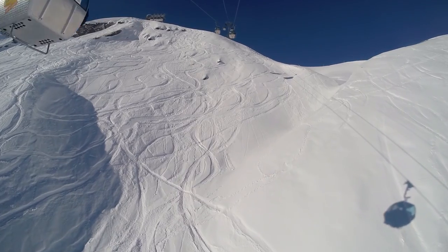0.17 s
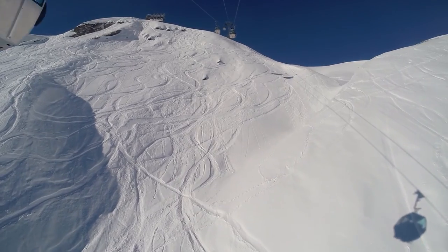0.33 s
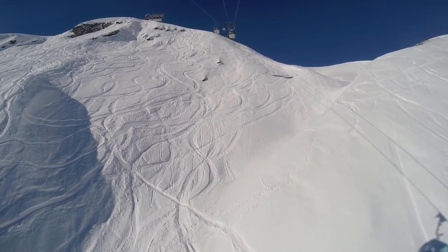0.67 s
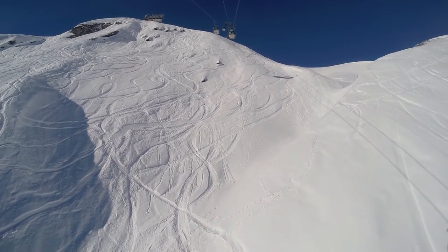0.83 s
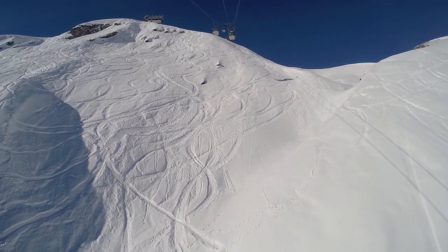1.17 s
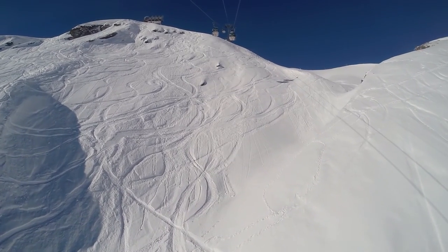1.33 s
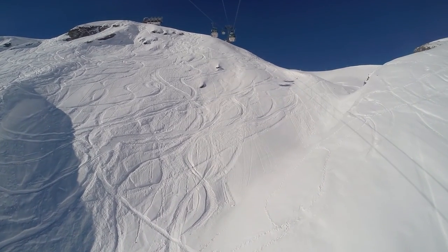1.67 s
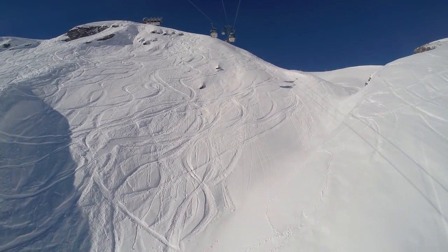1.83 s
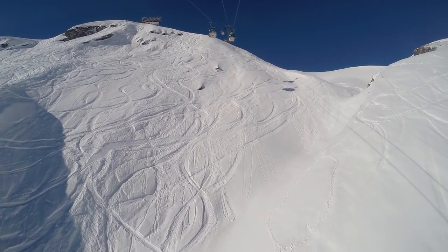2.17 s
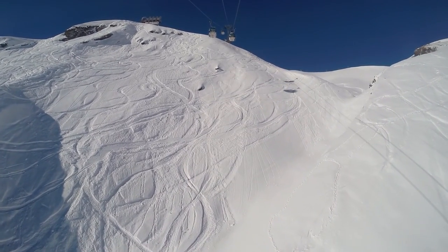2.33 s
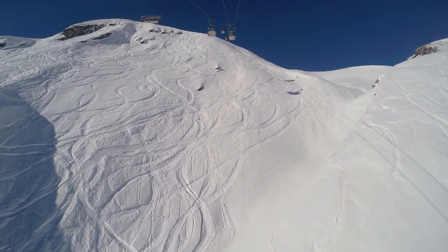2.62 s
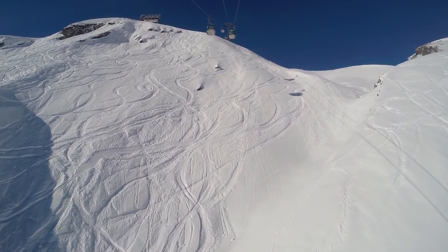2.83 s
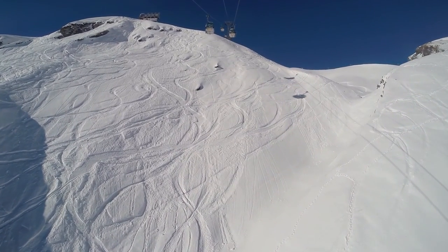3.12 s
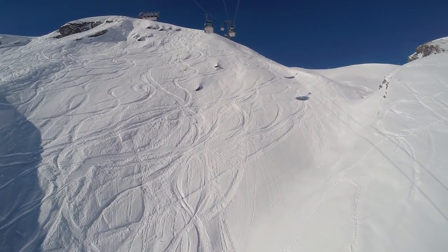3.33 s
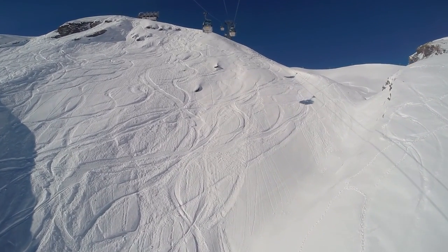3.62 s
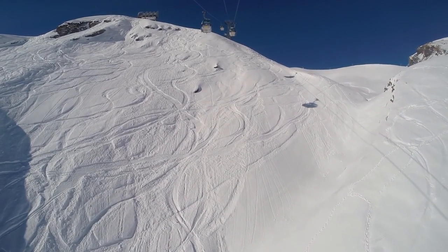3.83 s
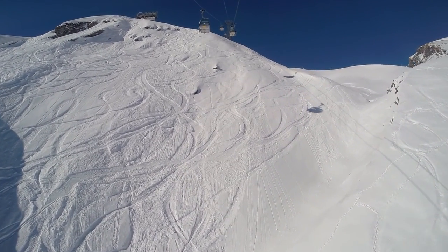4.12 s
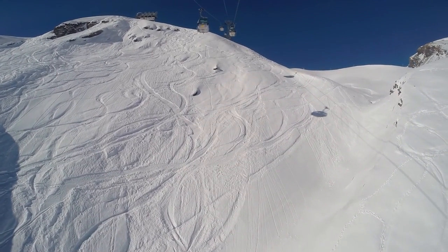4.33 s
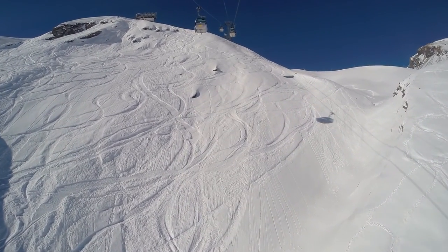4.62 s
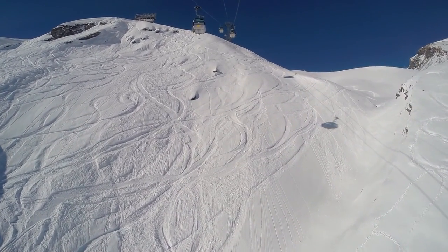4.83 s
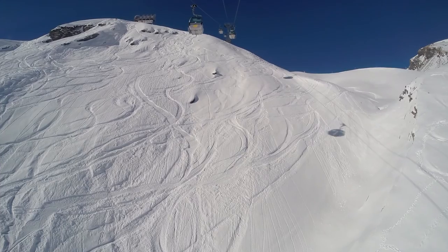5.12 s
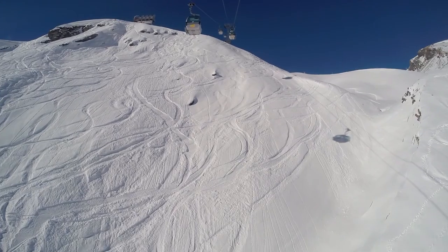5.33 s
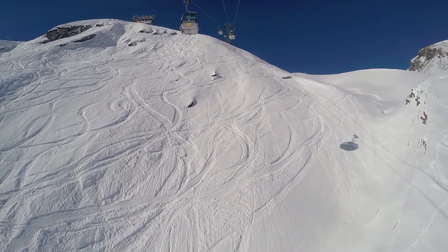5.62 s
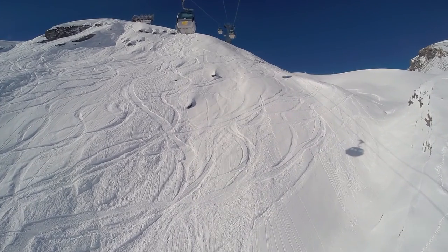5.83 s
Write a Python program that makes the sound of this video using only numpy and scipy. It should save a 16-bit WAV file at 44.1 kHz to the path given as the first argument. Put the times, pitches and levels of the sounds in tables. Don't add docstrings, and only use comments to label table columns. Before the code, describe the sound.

A cabin riding a haul rope hums unevenly around a low note, with irregular heaving rumble underneath. Early movement brings soft bumps, fabric rustles, strap snaps, plastic ticks and loud crisp clasp clicks, all close to the camera microphone in a small enclosed space. Activity thins after two seconds, with clicks near 2.6 and 3.3, and the rumble calms while the hum swells again at the end.

```python
import sys
import numpy as np
from scipy import signal
from scipy.fft import rfft, irfft, next_fast_len
from scipy.io import wavfile
from scipy.ndimage import map_coordinates

SR = 44100
rng = np.random.default_rng(int(sys.argv[2]) if len(sys.argv) > 2 else 0)


def bounce(signal):
    frames = np.transpose(np.atleast_2d(signal))
    limited = np.clip(frames, -1, 1)
    pcm = np.round(limited * 32767).astype(np.int16)
    wavfile.write(sys.argv[1], SR, pcm)


def amplitude_ratio(level_db):
    exponent = np.asarray(level_db, float) / 20
    return 10 ** exponent


N = 264159


def unit(x):
    return x / np.sqrt(np.mean(x ** 2) + 1e-20)


def curves(rows):
    s, *cols = np.transpose(rows)
    return [np.interp(np.arange(N) / SR, s, c) for c in cols]


def wobble(rate):
    knots = rng.standard_normal(int(N * rate / SR) + 4)
    return map_coordinates(knots, [np.arange(N) * rate / SR])


def filtered(x, response):
    m = next_fast_len(len(x) + 8192)
    return irfft(rfft(x, m) * response(np.fft.rfftfreq(m, 1 / SR)), m)[:len(x)]


def shape(points):
    f, db = np.transpose(points)
    return lambda hz: amplitude_ratio(np.interp(np.log(hz + 1), np.log(f + 1), db, -120, -120))


def modes(rows):
    def response(f):
        total = 0
        for k, (center, width, db) in enumerate(rows):
            damped = 1j * f * width
            total = total + (-1) ** k * amplitude_ratio(db) * damped / (center * center - f * f + damped)
        return total
    return response


def noise(response, steady=0.):
    z = signal.hilbert(filtered(rng.standard_normal(N + 1), response))[:N]
    size = np.abs(z) / np.abs(z).mean()
    return unit(z.real / (size + 0.077) ** np.clip(steady, 0, 1))


def swells(times, levels_db, widths, rest_db):
    t = np.arange(0, N + 64, 64) / SR
    bells = np.exp(-((t - np.reshape(times, (-1, 1))) / np.reshape(widths, (-1, 1))) ** 2)
    peaks = np.interp(np.arange(N) / SR, t, amplitude_ratio(levels_db) ** 2 @ bells)
    return np.sqrt(peaks + amplitude_ratio(rest_db) ** 2)


def knocks(rows, body, ring_share, snap, soft_hz, sag=0.32):
    out, t = np.zeros(N + SR), np.arange(SR // 8) / SR
    sag_s = 0.0018
    for s, db, hz, t60, ring_db in rows:
        burst = rng.standard_normal(len(t)) * amplitude_ratio(-60 * t / t60)
        burst[0] = snap
        hit = filtered(burst, lambda f: modes(body)(f) / (1 + 1j * f / soft_hz) ** 2)
        swing = np.sin(2 * np.pi * hz * (t - sag * sag_s * np.exp(-t / sag_s)))
        ring = amplitude_ratio(ring_db - 20.0 - 60 * t / (ring_share * t60)) * swing
        hit = hit / np.abs(hit).max() + ring
        out[round(s * SR):][:len(t)] += amplitude_ratio(db + 2.0) * hit / np.abs(hit).max()
    return out[:N]


def camera():
    # (frequency [Hz], level [dB per Hz])
    hiss_color = [(140, -10.5), (240, -5.5), (285, -12), (536, -19), (735, -21), (1300, -27), (2080, -30.5),
                  (5530, -38), (7500, -42), (9760, -49), (12600, -49), (14000, -69.5), (15700, -67)]
    # (frequency [Hz], level [dB rms])
    whine_lines = [(10597, -84.5), (10645, -77), (10788, -94.5), (10837, -93.5), (10933, -88.5)]
    t = np.arange(N) / SR
    whine = np.zeros(N)
    for hz, db in whine_lines:
        whine += amplitude_ratio(db + 0.7 * wobble(6)) * np.sin(2 * np.pi * hz * t + 1.1 * wobble(14))
    hiss = amplitude_ratio(-52 + 0.5 * wobble(3.61)) * noise(shape(hiss_color))
    return hiss + np.sqrt(2) * whine


def fabric():
    # (time [s], length [s], level [dB], crispness [dB])
    strokes = [(0.037, 0.058, -51, -11.5), (0.192, 0.061, -63, -13), (0.334, 0.035, -59, -15),
               (0.55, 0.12, -57.5, -16), (0.728, 0.046, -57.5, -14), (0.865, 0.11, -57.5, -16.5),
               (1.218, 0.06, -58.5, -15), (1.335, 0.026, -57, -13), (1.372, 0.01, -55.5, -25),
               (1.437, 0.04, -60.5, -14), (1.53, 0.05, -65, -19), (1.71, 0.015, -62, -22),
               (1.91, 0.047, -58, -13.5), (2.047, 0.032, -58.5, -11), (2.284, 0.32, -69.5, -11),
               (2.672, 0.026, -60.5, -14), (2.79, 0.058, -66.5, -12), (3.382, 0.057, -65, -11),
               (3.514, 0.025, -67, -15), (3.7, 0.063, -69.5, -16), (3.836, 0.054, -66, -13),
               (4.782, 0.046, -69, -12), (5.393, 0.034, -64, -15)]
    # (frequency [Hz], level [dB per Hz])
    cloth_color = [(900, -6), (1400, -4.5), (2000, -8.5), (3100, -6), (3430, -1.5), (3800, -6),
                   (4900, -7.5), (5450, -4), (6000, -9), (7000, -10.5), (9000, -26), (11000, -47)]
    # (frequency [Hz], level [dB per Hz])
    crisp_color = [(6000, -24), (8000, 4), (10000, 4.5), (12500, 3), (13800, -5), (15600, -13)]
    s, length, db, crisp_db = np.transpose(strokes)
    rest_db = -66.5 - 1.5 * np.arange(N) / SR
    clumps = amplitude_ratio(1.2 * wobble(60) + 0.71 * wobble(440))
    body = unit(clumps * noise(shape(cloth_color)))
    crisp = unit(clumps * amplitude_ratio(1.0 * wobble(25.15)) * noise(shape(crisp_color)))
    rustle = swells(s, db, length, rest_db) * body
    rustle += swells(s, db + crisp_db, length, rest_db - 11.5) * crisp
    return amplitude_ratio(5.0) * rustle


def window_and_plastic_taps():
    # (time [s], peak [dB], pitch [Hz], t60 [s], ring [dB])
    plastic = [(0.7417, -38.5, 2280, 0.046, 3), (1.1554, -34.5, 2740, 0.039, 9),
               (1.163, -44, 2000, 0.096, -2), (1.227, -42, 2350, 0.11, 10), (1.3047, -25.5, 2900, 0.048, 5),
               (1.315, -40, 2730, 0.049, 8), (1.3620, -34, 2350, 0.06, 5), (1.4326, -40.5, 2880, 0.04, 6),
               (1.698, -46, 2400, 0.036, 6), (2.6543, -40.5, 2280, 0.036, 23),
               (2.7291, -50, 2033, 0.039, 2), (5.122, -54, 1420, 0.03, 10), (5.362, -57, 1350, 0.04, 9)]
    # (frequency [Hz], width [Hz], level [dB])
    shell = [(1420, 210, 5.5), (2400, 260, 7), (3230, 670, 4.5), (5200, 650, -1)]
    # (time [s], peak [dB], pitch [Hz], t60 [s], ring [dB])
    ticks = [
        (4.650, -43.5, 3230, 0.014, 23),
    ]
    # (frequency [Hz], width [Hz], level [dB])
    frame = [(3230, 600, 4), (6000, 3000, -3)]
    taps = knocks(plastic, shell, ring_share=1.1, snap=7.5, soft_hz=3200)
    return taps + knocks(ticks, frame, ring_share=1.4, snap=30, soft_hz=9000, sag=0)


def boot_thuds():
    # (time [s], peak [dB])
    nudges = [
        (0.805, -36),
        (0.931, -43),
        (1.215, -32.5),
        (1.299, -33),
        (1.499, -37.5),
        (1.749, -38),
        (2.207, -40.5),
    ]
    # (frequency [Hz], width [Hz], level [dB])
    wall = [(306, 133, 1.5), (397, 120, -7), (522, 110, -9.5)]
    hz, t60, ring_db = 314, 0.14, 4
    rows = [(s, db, hz, t60, ring_db) for s, db in nudges]
    return knocks(rows, wall, ring_share=0.52, snap=3.2, soft_hz=380)


def strap_creaks():
    # (time [s], peak [dB], ring [dB])
    slips = [(0.923, -36, 21), (0.942, -45, 0), (0.972, -30, -8), (0.99, -48, 10), (1.004, -28, -9),
             (1.037, -32, 1), (1.073, -33, -7), (1.212, -60, 8), (1.265, -46, 14), (1.28, -28, -1),
             (1.345, -34, 0), (1.378, -33, -1), (1.397, -43, 10), (1.414, -29, -1), (1.446, -30.5, -5),
             (1.466, -37, 8)]
    # (frequency [Hz], width [Hz], level [dB])
    strap = [(714, 960, 12.5), (1440, 900, 8.5)]
    hz, t60 = 1050, 0.035
    rows = [(s, db, hz, t60, ring_db) for s, db, ring_db in slips]
    return knocks(rows, strap, ring_share=1.13, snap=19, soft_hz=1900)


def clasp():
    # (time [s], peak [dB], bright [dB], top [dB], free ring [s])
    clicks = [
        (0.1413, -21, -21, -43, 0.06),
        (0.855, -15.5, -17.5, -24, 0.015),
        (2.5833, -16, -17, -29, 0.045),
        (3.337, -20, -9, -16, 0.033),
    ]
    # (base [dB], body [dB], edge [dB], attack [s], rebound [dB])
    contacts = [
        (-2, -1.5, -5, 0.00043, -14),
        (-2.5, 2, 0.5, 0.00033, -16),
        (0.5, 1.5, -3, 0.00028, -8),
        (0, 3, 5, 0.0012, -7),
    ]
    # (frequency [Hz], level [dB], t60 [s], build-up [s])
    metal = [(1254, -6, 0.054, 0.00041), (1427, -10.5, 0.068, 0.00077), (2006, -22.5, 0.086, 0.0023),
             (2500, -16, 0.059, .002), (2740, -10, 0.083, 0.0022), (3040, -18, 0.068, .001),
             (3322, -2.5, 0.087, 0.0019), (3670, -22, .07, .001), (4150, -9, 0.046, .0005),
             (4480, -17, 0.04, .0005), (5310, -16, 0.071, 0.0026), (6180, -10, 0.23, 0.004),
             (6470, -16, 0.07, .001), (6710, -12.5, 0.05, .0008), (7200, -23, 0.034, .002),
             (7630, -20, 0.032, 0.0022), (10645, -23, 0.035, .008)]
    # (frequency [Hz], level [dB per Hz])
    crack_color = [(530, -53), (900, -67), (1300, 3.5), (2330, -8), (2700, -3.5), (3330, 6), (4300, -6),
                   (5090, -14.5), (6290, -1), (7780, -23.5), (8410, -25), (10900, -38), (13000, -38)]
    tone_hz = [1610, 2220, 2900, 3180, 3800, 4970, 5450, 7800, 8750]
    snap_hz, snap_db, snap_t60, snap_sag, snap_sag_s = 3395, 0.5, 0.019, 0.32, 0.0012
    rebound_s = 0.0058
    out, t = np.zeros(N + SR), np.arange(SR // 4) / SR
    snap_phase = 2 * np.pi * snap_hz * (t - snap_sag * snap_sag_s * np.exp(-t / snap_sag_s))
    snap = amplitude_ratio(snap_db - 60 * t / snap_t60) * np.sin(snap_phase)
    for click, contact in zip(clicks, contacts):
        s, db, bright_db, top_db, free_s = click
        base_db, body_db, edge_db, attack_s, rebound_db = contact
        damping = amplitude_ratio(-60 * np.maximum(t - free_s, 0) / 0.07)
        tone_db = [base_db, body_db, body_db, 0, edge_db, edge_db,
                   bright_db + 10.5, bright_db + 23.0, top_db + 31.0]
        tone = lambda hz: amplitude_ratio(np.interp(hz, tone_hz, tone_db))
        ring = np.zeros(len(t))
        for hz, level_db, t60, rise in metal:
            beat = 1 + 0.13 * np.sin(2 * np.pi * rng.uniform(40, 100) * t)
            swing = np.sin(2 * np.pi * hz * t + rng.uniform(0, 2 * np.pi)) * (1 - np.exp(-t / rise))
            ring += tone(hz) * amplitude_ratio(level_db + rng.normal(0, 1.0) - 60 * t / t60) * beat * swing
        ring += snap
        late = t - rebound_s
        rebound = 0.35 * amplitude_ratio(-60 * late / 0.12) + amplitude_ratio(rebound_db - 60 * late / 0.0058)
        blows = amplitude_ratio(-60 * t / 0.023) + (late > 0) * rebound
        crack = filtered(rng.standard_normal(len(t)) * blows, lambda hz: shape(crack_color)(hz) * tone(hz))
        hit = (ring * damping + 2.26 * crack) * (1 - np.exp(-t / attack_s))
        out[round(s * SR):][:len(t)] += amplitude_ratio(db - 11.5) * hit
    return out[:N]


def passenger():
    # (time [s], level [dB])
    effort = [(0, -50), (.05, -47), (.15, -60), (.4, -59), (.55, -49.5), (.82, -52), (.98, -50),
              (1.12, -55), (1.3, -47), (1.45, -48.5), (1.53, -56.5), (1.6, -58), (2.25, -61), (2.4, -68.5),
              (3.0, -76)]
    # (time [s], bump [dB], panel [dB])
    shifts = [(0.0, -29.5, -56), (0.14, -28, -58), (0.35, -32, -57.5), (0.55, -31.5, -48),
              (0.68, -29.5, -71), (0.84, -27.5, -55), (0.96, -25.5, -42.5), (0.9, -49, -45),
              (1.04, -30, -58), (1.13, -34, -49.5), (1.2, -36, -45.5), (1.28, -53, -46),
              (1.38, -31.5, -43.5), (1.46, -28.5, -41.5), (1.54, -41, -46.5), (1.6, -32, -61),
              (1.71, -29.5, -49.5), (1.87, -46, -50), (2.05, -53, -62), (2.21, -32.5, -50),
              (2.62, -48, -67), (3.1, -41.5, -71.5), (4.45, -40, -55.5)]
    # (frequency [Hz], level [dB per Hz])
    bump_color = [(70, -22), (88, -1), (105, 4.5), (160, -0.5), (215, -10.5), (250, -31), (330, -43)]
    # (frequency [Hz], width [Hz], level [dB])
    panel_modes = [(290, 70, -5), (365, 24, 1), (460, 60, -8)]
    # (frequency [Hz], level [dB per Hz])
    rub_color = [(200, -31), (300, -4.5), (500, 4), (900, -2), (1400, -6.5), (2000, -14.5), (3500, -12.5)]
    shift_s = 0.037
    (effort_db,) = curves(effort)
    s, bump_db, panel_db = np.transpose(shifts)
    rub = unit(noise(shape(rub_color)) * amplitude_ratio(1.7 * wobble(40)))
    bump_gain = swells(s, bump_db + 0.5, shift_s, effort_db + 9.5)
    bump_gain = np.hypot(amplitude_ratio(-50.5), bump_gain)
    bump = bump_gain * noise(shape(bump_color), steady=0.95)
    steep = lambda hz: np.abs(modes(panel_modes)(hz)) ** 2
    panel = swells(s, panel_db, shift_s, effort_db - 1.5) * noise(steep, steady=0.6)
    return bump + panel + amplitude_ratio(effort_db) * rub


def hull():
    # (time [s], level [dB])
    sway = [(0, -21), (1.4, -24), (2.2, -27), (3.0, -29), (4.0, -34), (5.99, -39)]
    # (time [s], heave [dB], boom [dB], floor drumming [dB])
    lurches = [(0.05, -23, -40, -26), (0.24, -31, -36, -30), (0.5, -21, -39, -30), (0.68, -15, -14, -26.5),
               (0.85, -27, -39, -27), (1.04, -17, -22, -22.5), (1.18, -19, -38, -43),
               (1.36, -11.5, -19.5, -40), (1.48, -15.5, -10.5, -37), (1.67, -16.5, -30, -39),
               (1.84, -15.5, -16, -31), (1.94, -19.5, -30, -34), (2.12, -37, -15.5, -52),
               (2.2, -22, -19, -47), (2.42, -29.5, -23, -32), (2.58, -31, -21, -35),
               (2.82, -22.5, -33, -53), (3.0, -23.5, -34, -50), (3.3, -26.5, -42, -54),
               (3.52, -29.5, -23.5, -40), (3.7, -27, -47, -43), (4.42, -33, -45, -50),
               (4.65, -30.5, -30, -41), (4.85, -28, -39, -39), (5.17, -32, -41, -55),
               (5.52, -34, -28.5, -44), (5.7, -33, -34, -42)]
    # (frequency [Hz], level [dB per Hz])
    heave_color = [(7, -53), (12, -5.5), (15, -1), (21, 3), (26, -9), (34, -26)]
    boom_color = [(22, -44.5), (29, 7), (38, -2.5), (48, 3), (54, -20.5), (70, -30)]
    drum_color = [(44, -24.5), (56, 13.5), (62, 14.5), (76, -12), (86, 5.5), (100, -49.5)]
    # (time [s], level [dB])
    gliding_swells = [(0.08, -37), (0.25, -23.5), (0.38, -29), (0.62, -27.5), (0.74, -28), (0.87, -37),
                      (1.1, -36), (1.3, -47), (1.5, -36), (1.68, -34), (1.97, -29), (2.3, -43), (2.53, -30.5),
                      (2.7, -31), (2.9, -34), (3.07, -50), (3.22, -28.5), (3.37, -37), (3.47, -38.5),
                      (3.6, -32.5), (3.85, -34.5), (4.08, -45), (4.33, -32), (4.44, -34), (4.7, -30),
                      (5.04, -37.5), (5.2, -43.5), (5.43, -38), (5.58, -35), (5.69, -37.5), (5.8, -36.5),
                      (5.92, -48)]
    heave_s, boom_s, drum_s, gliding_s = 0.063, 0.045, 0.065, 0.062
    gliding_low_hz, gliding_high_hz, turn_s, glide_s = 130, 135.6, 1.5, 0.5
    (sway_db,) = curves(sway)
    s, heave_db, boom_db, drum_db = np.transpose(lurches)
    hz = gliding_high_hz - (gliding_high_hz - gliding_low_hz) / (1 + np.exp((np.arange(N) / SR - turn_s) / glide_s))
    gliding_tone = np.sqrt(2) * np.sin(2 * np.pi * np.cumsum(hz) / SR + 0.6 * wobble(12))
    low = swells(s, heave_db, heave_s, sway_db) * noise(shape(heave_color), steady=0.85)
    low += swells(s, boom_db, boom_s, sway_db - 0.5) * noise(shape(boom_color), steady=0.68)
    low = filtered(low, lambda f: 1 / (1 + (f / 56.6) ** 8))
    low += swells(s, drum_db, drum_s, -52) * noise(shape(drum_color), steady=0.62)
    return low + swells(*np.transpose(gliding_swells), gliding_s, -49) * gliding_tone


def rope():
    # (time [s], level [dB rms])
    hum_level = [(0, -33.5), (.1, -25), (.28, -34), (.75, -28.5), (1.2, -23), (1.55, -23.5), (1.8, -27.5),
                 (2.18, -24), (2.7, -29.5), (3.05, -31.5), (3.45, -38), (3.75, -33.5), (3.97, -38),
                 (4.18, -32), (4.57, -41), (4.85, -31), (5.45, -25), (5.99, -26.5)]
    # (time [s], frequency [Hz])
    hum_pitch = [(0, 146.6), (1.1, 146.8), (1.7, 147.6), (3.4, 147.6), (3.6, 148.8), (4.5, 148.8),
                 (4.8, 147.6)]
    # (time [s], level [dB])
    grip = [(0.0, -43), (0.2, -45), (0.45, -35.5), (0.58, -53), (0.7, -36), (0.77, -44.5), (0.98, -41),
            (1.15, -41.5), (1.45, -39.5), (1.57, -44), (3.45, -46), (3.69, -43.5), (4.54, -49.5),
            (5.99, -45.5)]
    # (multiple [of the strand rate], level [dB rms], growth [dB per s])
    multiples = [(2, -35.5, -4), (3, -39.5, 0.5), (5, -45.5, 2.5), (6, -41.5, 0), (7, -61, 0.5),
                 (8, -62, -9.5), (10, -51, 3.5), (13, -53.5, 2), (14, -56.5, 1.5), (15, -62, -6),
                 (16, -64, -2), (17, -47, 1.5), (18, -55, 2), (19, -54, 1), (20, -79, -2), (23, -74.5, 0.5)]
    strand_hz, grip_rest_db, middle_s = 12.31, -45, 3
    (hz,), (db,), (grip_db,) = curves(hum_pitch), curves(hum_level), curves(grip)
    t = np.arange(N) / SR
    hum = amplitude_ratio(db + 1.7 * wobble(7.8)) * np.sin(2 * np.pi * np.cumsum(hz) / SR)
    for order, order_db, growth in multiples:
        level_db = order_db + growth * (t - middle_s) + 2.8 * wobble(2.5)
        level_db += (order > 14.5) * (grip_db - grip_rest_db)
        drift = 0.9 * wobble(1.895) + rng.uniform(0, 2 * np.pi)
        hum += amplitude_ratio(level_db) * np.sin(round(order) * 2 * np.pi * strand_hz * t + drift)
    return np.sqrt(2) * hum


def scene():
    handling = fabric() + window_and_plastic_taps() + boot_thuds() + strap_creaks() + clasp()
    return (camera() + handling + passenger() + hull() + rope())[None]


def band_limit(dry):
    normal_hz, lowered_hz, stray_top_hz = 12900, 11300, 15100
    hz, t, z = signal.stft(dry, SR, nperseg=1024)
    block, band = np.arange(len(t)) // 2 * 2, np.arange(len(hz)) // 4

    def over_db(lo, hi):
        power = (np.abs(z[0, (hz > lo) & (hz < hi)]) ** 2).sum(0)
        db = 10 * np.log10(power + 1e-20)
        return (db - np.median(db))[block]

    luck = rng.uniform(size=len(t))[block]
    lowered = luck < 0.03 + 0.55 * (over_db(0, 100) > 7)
    low_edge_hz = lowered_hz + 900 * rng.uniform(size=len(t))[block]
    edge_hz = np.where(lowered, low_edge_hz, normal_hz)
    lift_hz = 230 * np.maximum(over_db(11200, 12800) - 1, 0)
    edge_hz = np.minimum(edge_hz + lift_hz, stray_top_hz)
    roomy = wobble(13)[np.minimum(block * 512, N - 1)] > 0.1
    chosen = rng.uniform(size=z.shape[1:])[band][:, block] < 0.45
    below_top = hz[:, None] < stray_top_hz - 1300 * luck ** 3 + 600 * lowered
    stray = chosen & (roomy | lowered) & below_top
    z = z * np.where((hz[:, None] > edge_hz) & ~stray, amplitude_ratio(-29.5), 1)
    return signal.istft(z, SR, nperseg=1024)[1][:, :N]


def low_pass(x):
    return signal.sosfilt(signal.butter(12, 15710, fs=SR, output="sos"), x)


def record(dry):
    opens_at, closes_at, fade_s = 0.17, 0.018, 0.006
    kept = band_limit(dry)
    fade = np.exp(-np.arange(N) / SR / fade_s)
    kept = kept + (opens_at - kept[:, :1]) * fade
    kept = kept + (closes_at - kept[:, -1:]) * fade[::-1]
    return low_pass(kept)


dry = scene()
out = record(dry)
bounce(out)
```